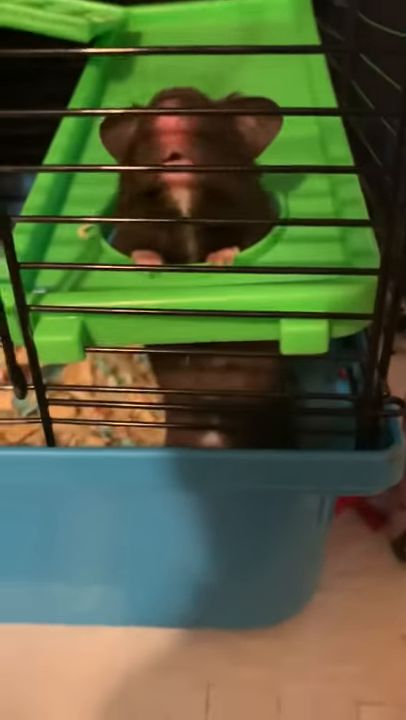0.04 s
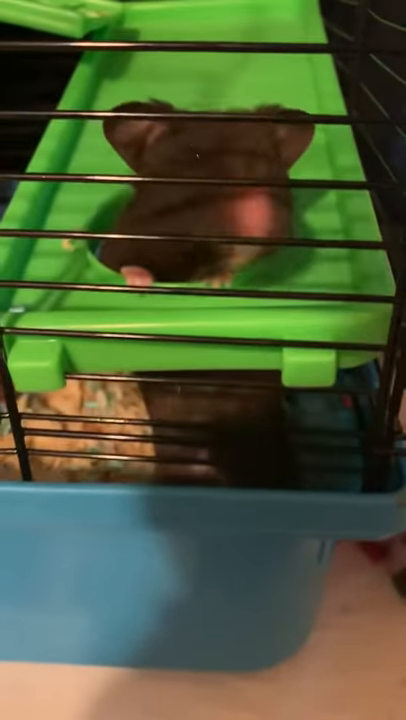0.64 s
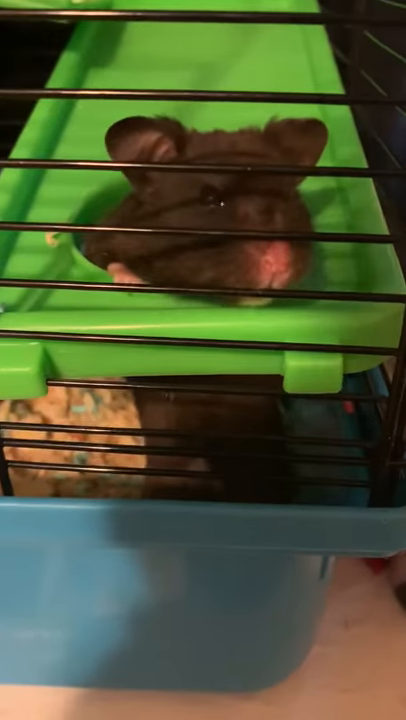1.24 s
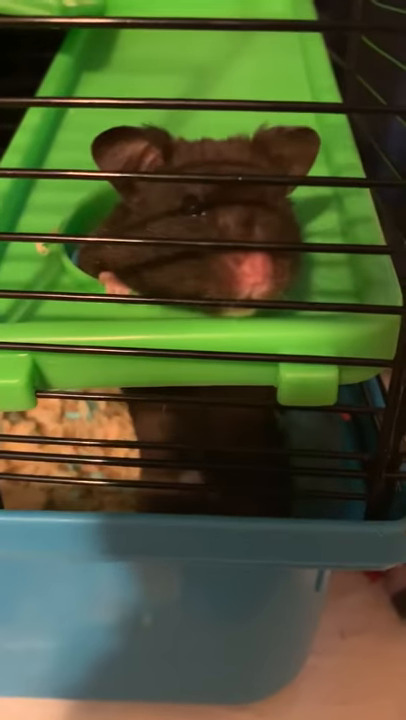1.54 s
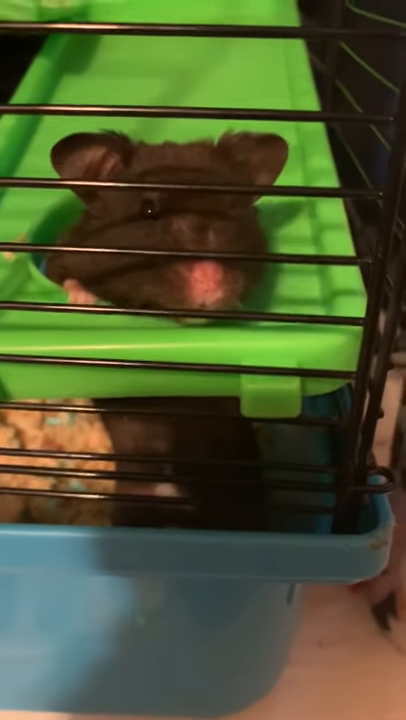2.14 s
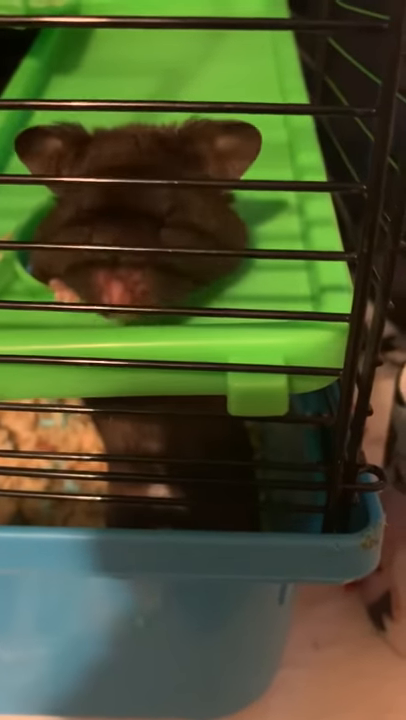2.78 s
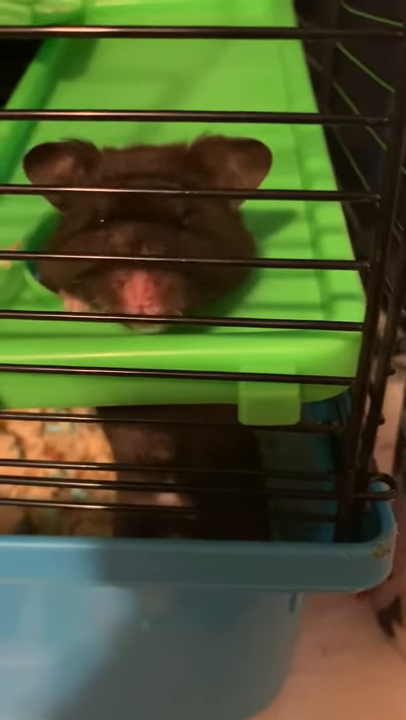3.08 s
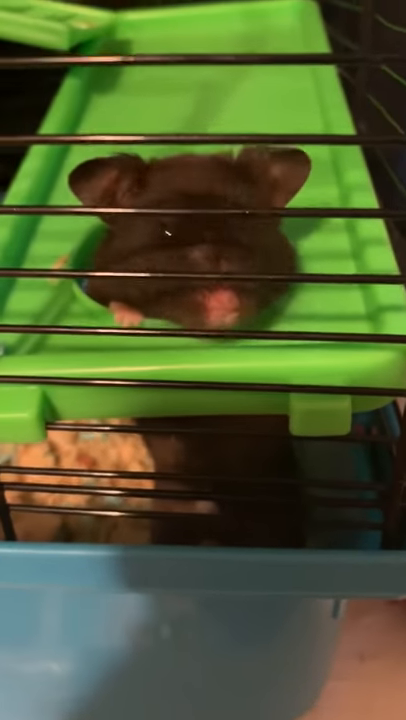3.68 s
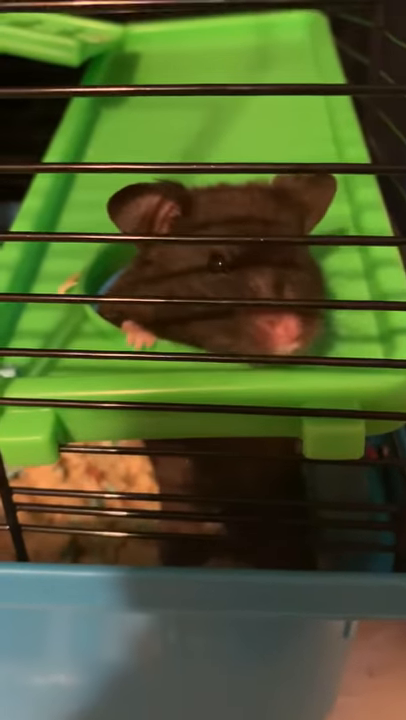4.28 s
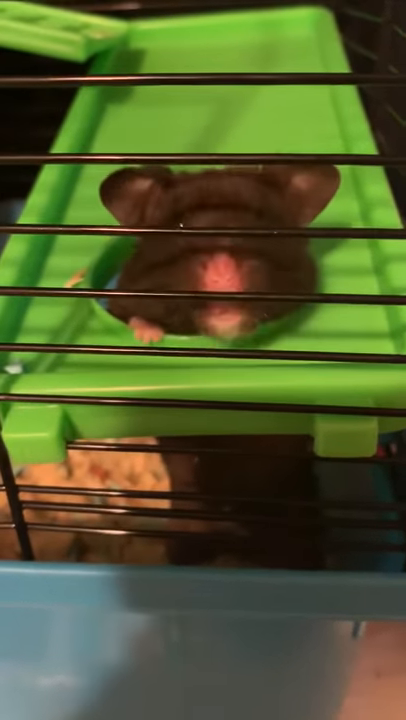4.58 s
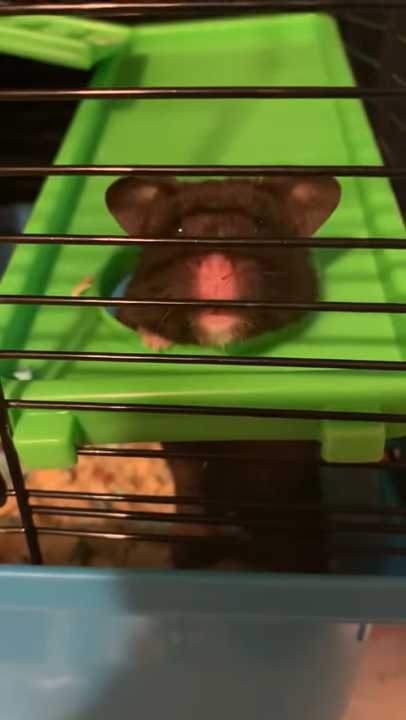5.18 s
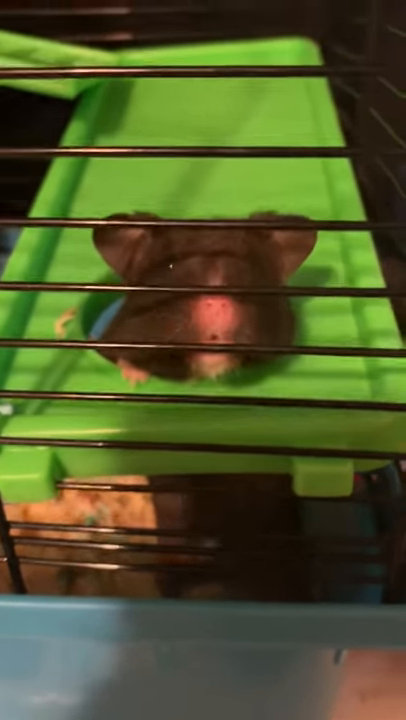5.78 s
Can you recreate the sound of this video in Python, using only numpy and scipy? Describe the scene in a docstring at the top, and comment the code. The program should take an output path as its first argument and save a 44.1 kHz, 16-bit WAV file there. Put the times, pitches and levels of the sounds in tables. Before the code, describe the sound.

Close, rasping screams and yips from an agitated hamster come in uneven bursts over a low room hum.

```python
"""A hamster's rasping scream, in its cage close to a hand-held microphone pair in a quiet, humming room.
The agitated animal squawks on in short bouts: the voice catches near 900 Hz, sags, and breaks into a
hissy rasp as its vocal folds flap unevenly. Long screams swell and may die in a grunt; short yips may
crack, stall and catch again. In between come soft mouth clicks, a faint hiss, two tiny high chirps and
two clean squeaks. A sharp knock comes last."""
import sys
import numpy as np
from scipy import signal
from scipy.fft import rfft, irfft, next_fast_len
from scipy.io import wavfile
from scipy.ndimage import uniform_filter1d

SR = 44100
rng = np.random.default_rng(int(sys.argv[2]) if len(sys.argv) > 2 else 0)


def transcribe(signal):
    """Save signal, clipped to [-1, 1], as a 16-bit WAV file at the path in sys.argv[1]."""
    frames = np.atleast_2d(signal).T
    limited = np.clip(frames, -1, 1)
    pcm = np.round(limited * 32767).astype(np.int16)
    wavfile.write(sys.argv[1], SR, pcm)


N = 265878

# Long screams, close up; roughness runs from 0 (clean) to about 1 (full rasp): start_s, peak_s, end_s,
# pitch_hz, first_roughness, last_roughness, peak_throat_db, peak_hiss_db, swell_db, sizzle_db, grunt_s
SCREAMS = [(-0.01, 0.19, 0.203, 968, 0.91, 0.68, -35, -32.5, 7.5, 3, .014),
           (0.297, 0.36, 0.402, 949.4, 0.81, 0.77, -34.5, -33, 10.5, 2.5, 0.038),
           (1.649, 1.98, 2.049, 941.6, .33, .85, -32.5, -30.5, 27, -8.5, .029),
           (2.162, 2.195, 2.256, 905, 0.6, 0.54, -33.5, -34.5, 1.5, -11, .017),
           (2.383, 2.63, 2.661, 912, .55, .42, -34, -38, 1.5, -3, 0.0071),
           (3.206, 3.579, 3.741, 920.7, .3, 0.3, -32.5, -31, 18.5, -3.5, 0.00045),
           (5.144, 5.316, 5.344, 920, .42, 0.46, -34.5, -39.5, 5.5, 5.5, 0.0024)]
# Short yips: start_s, end_s, pitch_hz, first_roughness, last_roughness, throat_db, hiss_db
YIPS = [(0.521, 0.642, 818, 1.1, 0.6, -41.5, -48), (0.649, 0.721, 983, 0.09, 0.6, -38.5, -49.5),
        (0.829, 0.851, 720.6, 0.68, 0.87, -49, -65.5), (2.771, 2.852, 821, .65, 0.67, -39, -52.5),
        (2.992, 3.052, 781, 0.5, 1, -40, -53), (3.860, 3.913, 883, 0, .7, -42, -55),
        (4.061, 4.146, 871, .65, 0.24, -41, -52.5), (4.286, 4.316, 887, 0.4, 0.61, -41, -49),
        (4.758, 4.82, 887.5, .25, 0.23, -41.5, -55.5), (4.961, 5.039, 847, 0.4, 0.2, -41, -56),
        (5.334, 5.377, 1036, .1, 0.05, -39.5, -54), (5.454, 5.511, 853, 0.35, .7, -41, -48.5),
        (5.628, 5.668, 725.3, 0.91, 0.88, -44, -53), (5.881, 5.939, 772, 0.4, 0.66, -40, -52)]
# Resonances of the throat, the open mouth and air at the teeth: frequency_hz, gain_db
THROAT = [(150, -12.5), (280, -5.5), (400, 7.5), (650, 3.5), (830, -0.5), (1000, -0.5), (1250, 3.5),
          (1700, 3.5), (2100, 3), (2550, -1), (2900, -21.5), (4000, -44)]
MOUTH = [(2300, -33), (2900, -4), (3350, 0.5), (4050, 4), (4700, -3), (7000, -51.5)]
TEETH = [(1000, -32), (4600, -24.5), (5500, 0), (6600, 3.5), (7400, -6.5), (8200, -0.5), (9300, 4.5),
         (10000, -1.5), (12600, -10), (14000, 1.5), (15300, 4), (16000, -1.5)]
# Two hum lines in the room, before their trim: time_s, low_line_db, high_line_db
HUM_LEVELS = [(0.0, -53, -49.5), (1.6, -56, -54), (2.65, -55.5, -48.5), (3.1, -52.5, -52),
              (3.8, -57, -45.5), (4.8, -53.5, -43.5), (6.03, -55, -48)]
# Room tone under the hum: frequency_hz, gain_db
ROOM_TONE = [(25, -14.5), (100, -14), (200, -19), (300, -33), (1000, -47), (3000, -56), (16000, -58)]
# Hardest slaps of the folds, as the voice starts or cracks: start_s, relative_level_db
SNAPS = [(.168, -27), (.366, -30), (.529, -33), (.558, -31), (1.866, -32), (1.978, -34), (2.802, -35),
         (3.029, -35), (3.898, -32), (4.073, -33), (4.098, -36), (4.311, -34), (4.782, -34), (4.984, -33),
         (5.469, -35), (5.637, -34), (5.652, -34)]
# Soft clicks of the mouth: start_s, relative_level_db
MOUTH_CLICKS = [(1.383, -49), (1.420, -27), (1.440, -32)]
# Faint hiss before the third scream
WARNING_LEVELS = [(1.44, -54), (1.48, -59.5), (1.58, -58), (1.65, -53), (1.7, -48)]  # time_s, level_db
WARNING_SPECTRUM = [(200, -8), (500, -5), (1900, -0.5), (2700, -16.5), (3600, -1.5), (9000, -32)]  # frequency_hz, gain_db
# Thin whistled chirps: start_s, end_s, first_hz, last_hz, relative_level_db
CHIRPS = [(2.11, 2.142, 11950, 8000, -57.5), (4.676, 4.696, 16000, 13000, -54.5)]
# Clean squeaks, one list each: time_s, pitch_hz, relative_level_db
SQUEAKS = [
    [(4.321, 911, -51), (4.328, 870, -38.5), (4.36, 847, -43.5), (4.42, 824, -49), (4.465, 835, -49.5),
     (4.49, 815, -80)],
    [(4.543, 784, -72.5), (4.562, 887, -45), (4.585, 884, -40.5), (4.608, 847, -37), (4.625, 745, -49.5),
     (4.64, 660, -67)],
]
# Thread of air running through both squeaks
SQUEAK_AIR_LEVELS = [(4.31, -50.5), (4.42, -60.5), (4.6, -48.5), (4.65, -54)]  # time_s, level_db
SQUEAK_AIR_SPECTRUM = [(4500, -13.5), (6600, -3.5), (7800, -23), (9400, 9), (10700, 1), (12500, -14),
                       (15200, 5)]  # frequency_hz, gain_db
# The closing knock
KNOCK_LEVELS = [(6.005, -74), (6.017, -48), (6.023, -27), (6.03, -14)]  # time_s, level_db
KNOCK_SPECTRUM = [(100, -6), (500, -0.5), (850, -3), (1200, 8.5), (1700, 7.5), (2400, -54), (3700, 3.5),
                  (5000, -10.5), (15000, -38)]  # frequency_hz, gain_db
# Direct sound at the microphone pair
MIC_PHASE = [(100, 0), (400, -.55), (780, -.5), (1500, 0), (2670, .9), (3700, 1.7), (6500, 5.8),
             (7400, 6.6), (8000, 7.5), (10900, 12.4), (11600, 12.7), (15200, 18.8)]  # frequency_hz, left_lead_rad
MIC_BALANCE = [(300, 0), (700, -1), (900, -4), (1250, 0), (2100, 1), (2750, -4.5), (3000, 0)]  # frequency_hz, left_over_right_db
# Reverberation of the room: frequency_hz, t60_s
ROOM_DECAY = [(200, 0.13), (1500, 0.17), (6000, 0.15), (15000, 0.045)]

GRUNT_HZ, GRUNT_ROUGHNESS, GRUNT_THROAT_DB, GRUNT_HISS_DB = 427, 0.28, -41.5, -44.5


def amp(db):
    return 10 ** (np.asarray(db) / 20)


def unit_rms(x):
    return x / np.sqrt(np.mean(x ** 2) + 1e-20)


def at_frequency(points, hz):
    """Read a curve along a logarithmic frequency axis."""
    point_hz, value = np.transpose(points)
    return np.interp(np.log(hz + 1), np.log(point_hz + 1), value)


def envelope(rows, column=1):
    """Gain over the whole scene from a dB curve; silent outside it."""
    rows, t = np.array(rows), np.arange(N) / SR
    inside = (t >= rows[0, 0]) & (t <= rows[-1, 0])
    return amp(np.interp(t, rows[:, 0], rows[:, column])) * uniform_filter1d(inside * 1., size=100)


def samples(start_s, end_s):
    return np.arange(max(round(start_s * SR), 0), round(end_s * SR))


def add(mix, start_s, sound):
    part = mix[max(round(start_s * SR), 0):][:len(sound)]
    part += sound[:len(part)]


def colour(x, spectrum):
    """Causal filter of the given shape that keeps the power of white noise."""
    log_gain = np.log(amp(at_frequency(spectrum, abs(np.fft.fftfreq(2 ** 12, 1 / SR)))))
    taps = np.fft.ifft(np.exp(np.conj(signal.hilbert(log_gain)))).real[:2 ** 11]
    return signal.oaconvolve(x, taps / np.linalg.norm(taps))[:N]


def noise_swell(levels, spectrum):
    return colour(envelope(levels) * rng.standard_normal(N), spectrum)


def pulses(cycles, sizes):
    """One sharp pulse at the exact moment of each completed cycle."""
    at = np.flatnonzero(np.diff(np.floor(cycles)) > 0)
    late = (np.floor(cycles[at + 1]) - cycles[at]) / (cycles[at + 1] - cycles[at])
    taps, out = np.arange(-8, 9), np.zeros(len(cycles))
    offset = taps - late[:, None]
    shape = np.sinc(offset) * np.cos(np.pi * offset / (len(taps) + 1)) ** 2
    np.add.at(out, np.clip(at[:, None] + taps, 0, len(out) - 1), sizes[at, None] * shape)
    return out


def screams(throat_share=.2):
    """Runs of voice whose effort arches about a peak, mostly in the hiss; some end in a grunt."""
    for start, peak, end, hz, first, last, throat_db, hiss_db, swell_db, sizzle_db, grunt_s in SCREAMS:
        drop_db = swell_db * ((samples(start, end) / SR - peak) / (peak - start)) ** 2
        yield start, end, hz, (first, last), throat_db - throat_share * drop_db, hiss_db - drop_db, sizzle_db
        if grunt_s > .005:
            roughness = (GRUNT_ROUGHNESS, GRUNT_ROUGHNESS)
            yield end, end + grunt_s, GRUNT_HZ, roughness, GRUNT_THROAT_DB, GRUNT_HISS_DB, sizzle_db


def yips(stall_s=.004, margin_s=.012, pitch_lift=1.03, lift_db=.44):
    """Short runs of voice; a snap in mid-yip stalls it, and it catches again a little higher and louder."""
    for start, end, hz, first, last, throat_db, hiss_db in YIPS:
        stalls = [s + stall_s for s, _ in SNAPS if start + margin_s < s < end - margin_s]
        if stalls:
            yield start, stalls[0], hz, (first, first), throat_db, hiss_db, 0
            yield stalls[0], end, hz * pitch_lift, (last, last), throat_db + lift_db, hiss_db + lift_db, 0
        else:
            yield start, end, hz, (first, last), throat_db, hiss_db, 0


def bouts(length_s, pitch_hz, rough, wobble, draws, bout_s=.025, sag=.17, collapse=.42, jitter=.43,
          droop=.068, droop_s=.012, attack_s=.0072):
    """In each bout the folds catch at a new pitch, sag, then collapse into irregular flaps."""
    length_draw, pitch_draw, break_draw, sag_draw = draws
    t = np.arange(len(rough)) / SR
    count = max(int(length_s / bout_s + .3), 1)
    edges = np.r_[0, np.cumsum(.35 + length_draw[:count])]
    place = np.interp(np.linspace(0, edges[-1], len(t), endpoint=False), edges, np.arange(count + 1))
    bout, age = place.astype(int), place % 1
    breaks_at = 1 - rough * (.3 + 1.5 * break_draw[bout])  # a rougher voice breaks up earlier
    chaos = .27 * rough + .8 * np.clip(.5 + (age - breaks_at) / .2, 0, 1)
    catch = .99 + .1 * (pitch_draw[bout] - pitch_draw[:count].mean())
    sag_depth = sag * np.minimum(.4 + 2.5 * rough, 1) * (.2 + sag_draw[bout])
    fall = sag_depth * age + collapse * age ** 7
    hz = pitch_hz * catch * (1 - fall) * np.exp(jitter * chaos * wobble)
    hz *= 1 - droop * np.exp((t - t[-1]) / droop_s)  # slides down as the run ends
    stall = 1 - .4 * np.exp(-age / .05) - .6 * age ** 20
    swell = stall * (1 - np.exp(-t / attack_s))
    # the folds slap hardest just before they stall; the last flaps are dull
    slap = 1 + .16 * np.sqrt(rough) * np.exp(-((age - .78) / .05) ** 2)
    bright = slap * (.9 + .23 * chaos) * (1 - age ** 10)
    return hz, chaos, swell, bright


def grunt(pitch_hz, rough):
    """With the pressure spent, the folds flap low and evenly and die away."""
    spent = np.linspace(0, 1, len(rough))
    return pitch_hz * (1 - .2 * spent), rough, 1 - .8 * spent, (1 - spent) ** 2


def vocal_folds(runs, shimmer_db=2.5, sputter_below_db=-34.5, puff_s=.0004, steady_air=.25):
    """Each flap of the folds makes a pulse, a sharp edge and a puff of air."""
    pitch_noise, size_noise, air_noise = rng.standard_normal((3, N))
    wobble = unit_rms(uniform_filter1d(pitch_noise, size=45))
    for (start, end, pitch_hz, roughness, _, hiss_db, _), draws in zip(runs, rng.random((len(runs), 4, 64))):
        span = samples(start, end)
        rough = np.linspace(*roughness, len(span))
        if pitch_hz == GRUNT_HZ:
            hz, chaos, swell, bright = grunt(pitch_hz, rough)
        else:
            hz, chaos, swell, bright = bouts(end - start, pitch_hz, rough, wobble[span], draws)
        cycles = np.cumsum(hz) / SR + .7
        # on weak airflow the flaps grow more uneven in size
        uneven_db = shimmer_db + .1438 * np.maximum(sputter_below_db - hiss_db, 0)
        flap_noise = np.clip(size_noise[span[0] + cycles.astype(int)], -2.4, 2.4)
        size = amp(uneven_db * chaos * flap_noise) * swell
        size *= signal.windows.tukey(len(span), .0017 / (end - start))
        puffs = bright * size * (steady_air + np.exp(-(cycles % 1) / hz / puff_s))
        voice, edge = pulses(cycles, size), pulses(cycles, size * bright)
        yield span, unit_rms(voice), unit_rms(edge), unit_rms(puffs * air_noise[span])


def squawks(throat_air_db=-22, mouth_air_db=-10, teeth_edge_db=-4, teeth_air_db=-2, sizzle_hz=12500):
    """The pulses ring the throat, their sharp edges the open mouth; the puffs hiss at the teeth."""
    throat, mouth, teeth = np.zeros((3, N))
    highpass = signal.butter(4, sizzle_hz, "high", fs=SR, output="sos")
    runs = [*screams(), *yips()]
    for run, (span, voice, edge, air) in zip(runs, vocal_folds(runs)):
        _, _, pitch_hz, _, throat_db, hiss_db, sizzle_db = run
        if pitch_hz == GRUNT_HZ:  # slack folds close softly, dulling the grunt
            voice = np.sqrt(.5) * signal.lfilter(np.hanning(SR // 1500), np.sqrt(SR // 1500), voice)
        throat[span] += amp(throat_db) * (voice + amp(throat_air_db) * air)
        mouth_db = -35 + 1.06 * (hiss_db + 32)  # the mouth opens with the airflow
        mouth[span] += amp(mouth_db) * (edge + amp(mouth_air_db) * air)
        hiss = amp(teeth_edge_db) * edge + amp(teeth_air_db) * air
        sizzle = signal.sosfiltfilt(highpass, hiss)  # its level changes with the set of the teeth
        teeth[span] += amp(hiss_db) * (hiss + (amp(sizzle_db) - 1) * sizzle)
    return colour(throat, THROAT) + colour(mouth, MOUTH) + colour(teeth, TEETH)


def room_hum(low_hz=58.1, high_hz=97.7, low_trim_db=-1, tone_above_hum_db=-68.5):
    """Two wavering hum lines over soft room tone, nearly alike at both microphones."""
    t, rates_hz = np.arange(N) / SR, np.geomspace(.3, 9, 20)
    low_drift, high_drift = (
        unit_rms(sum(np.sin(2 * np.pi * (hz * t + rng.random())) / np.sqrt(hz) for hz in rates_hz))
        for _ in range(2))
    hum = amp(low_trim_db) * envelope(HUM_LEVELS) * np.sin(2 * np.pi * low_hz * t + .5 * low_drift)
    hum += envelope(HUM_LEVELS, column=2) * np.sin(2 * np.pi * high_hz * t + 1.1 * high_drift)
    shared, left, right = (colour(rng.standard_normal(N), ROOM_TONE) for _ in range(3))
    rms_above_hum = signal.sosfilt(signal.butter(6, 150, "high", fs=SR, output="sos"), shared).std()
    tone = shared + .43 * np.array([left, right])
    return np.sqrt(2) * hum + amp(tone_above_hum_db) / rms_above_hum * tone


def snaps(decay_s=.00063, thud_db=-4, spit_db=-6):
    """Each hard slap of the folds is a millisecond spit of air that also thumps the throat."""
    t = np.arange(SR // 200) / SR
    spit, thud = np.zeros((2, N))
    for (start, db), noise in zip(SNAPS, rng.standard_normal((len(SNAPS), len(t)))):
        burst = amp(db) * np.exp(-t / decay_s) * noise
        add(spit, start, burst)
        add(thud, start, np.array([np.linalg.norm(burst)]))
    return 2 * (amp(thud_db) * colour(thud, THROAT) + amp(spit_db) * colour(spit, TEETH))


def mouth_clicks(decay_s=.0024):
    """Tiny bursts in the mouth ring the throat as dull clicks."""
    t, out = np.arange(SR // 200) / SR, np.zeros(N)
    for (start, db), noise in zip(MOUTH_CLICKS, rng.standard_normal((len(MOUTH_CLICKS), len(t)))):
        burst = np.exp(-t / decay_s) * noise
        add(out, start, amp(db) * burst / np.linalg.norm(burst))
    return 2 * colour(out, THROAT)


def warning_hiss():
    """Faint, voiceless air leading into a long scream."""
    return noise_swell(WARNING_LEVELS, WARNING_SPECTRUM)


def chirps():
    """Brief, high whistles that fall fast."""
    out = np.zeros(N)
    for start, end, first_hz, last_hz, db in CHIRPS:
        hz = np.geomspace(first_hz, last_hz, round((end - start) * SR))
        add(out, start, 2 * amp(db) * np.hanning(len(hz)) * np.sin(2 * np.pi * np.cumsum(hz) / SR))
    return out


def squeaks(harmonics_db=(-2.5, -5, -21, -35, -38), waver=.0053):
    """The folds hold a clean, gliding note, with a thread of air above it."""
    t, out = np.arange(N) / SR, noise_swell(SQUEAK_AIR_LEVELS, SQUEAK_AIR_SPECTRUM)
    for rows in SQUEAKS:
        times, hz, _ = np.transpose(rows)
        wobble = unit_rms(uniform_filter1d(rng.standard_normal(N), size=60))
        cycles = np.cumsum(np.interp(t, times, hz) * (1 + waver * wobble)) / SR
        note = sum(amp(db) * np.cos(2 * np.pi * k * cycles) for k, db in enumerate(harmonics_db, 1))
        out += envelope(rows, column=2) * np.sqrt(2) * note
    return out


def knock():
    """A steep burst of noise through a resonant body, in the last instant."""
    return noise_swell(KNOCK_LEVELS, KNOCK_SPECTRUM)


def microphone_pair(x):
    """The direct sound reaches the left microphone a little earlier than the right."""
    size = next_fast_len(N + SR // 10)
    hz = np.fft.rfftfreq(size, 1 / SR)
    lag, tilt = at_frequency(MIC_PHASE, hz), amp(at_frequency(MIC_BALANCE, hz) / 2)
    return irfft(rfft(x, size) * np.array([tilt, np.exp(-1j * lag) / tilt]), size)[:, :N]


def cage_scatter(x, t60_s=.075):
    """Quick reflections off the bars and the plastic shelf, different at each microphone."""
    t = np.arange(SR // 32) / SR
    taps = rng.standard_normal((2, len(t))) * amp(-60 * t / t60_s)
    taps = signal.lfilter([1, -1], [1, -.7], taps)  # thin bars scatter mostly treble
    return signal.fftconvolve(x[None], taps / np.linalg.norm(taps[0]), axes=1)[:, :N]


def room_reverb(x, gap_s=.004):
    """Sparse reflections from the room beyond the cage, each band dying at its own speed."""
    taps = rng.choice([-1., 1.], (2, SR // 2)) * (rng.random((2, SR // 2)) < .1)
    taps[:, :round(gap_s * SR)] = 0
    hz, t, bands = signal.stft(taps, SR, nperseg=256)
    decay = amp(-60 * t / at_frequency(ROOM_DECAY, hz)[:, None])
    tail = signal.istft(bands * decay, SR, nperseg=256)[1]
    tail = tail + .5 * tail[::-1]  # each microphone hears some of the other side
    return signal.fftconvolve(x[None], tail / np.linalg.norm(tail[0]), axes=1)[:, :N]


def scene(room_db=-21, cage_db=-17):
    """Close sounds at the pair, with a little cage and room around them and the hum beneath."""
    near = squawks() + snaps() + mouth_clicks() + squeaks() + chirps() + warning_hiss() + knock()
    reflections = amp(cage_db) * cage_scatter(near) + amp(room_db) * room_reverb(near)
    return microphone_pair(near) + reflections + room_hum()


def record(dry, cutoff_hz=16000):
    """The recorder's band limit."""
    lowpass = signal.firwin(301, cutoff_hz, window=("kaiser", 8), fs=SR)
    return signal.oaconvolve(dry, lowpass[None], "same")


dry = scene()
out = record(dry)
transcribe(out)
```